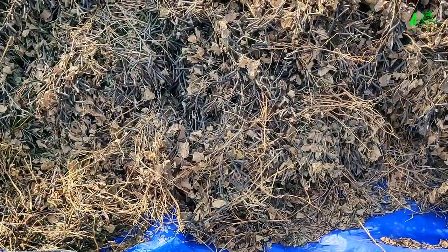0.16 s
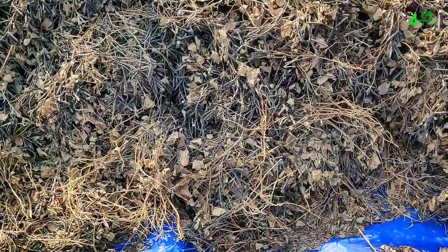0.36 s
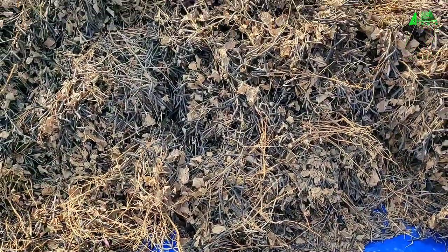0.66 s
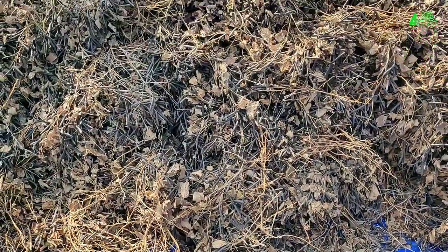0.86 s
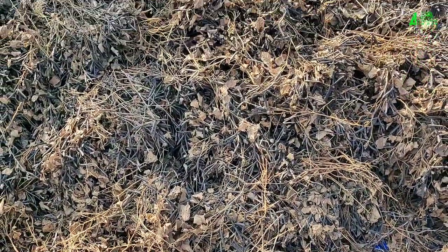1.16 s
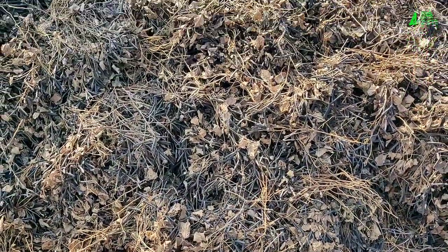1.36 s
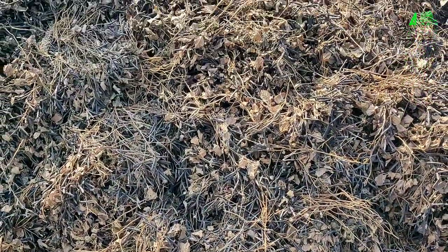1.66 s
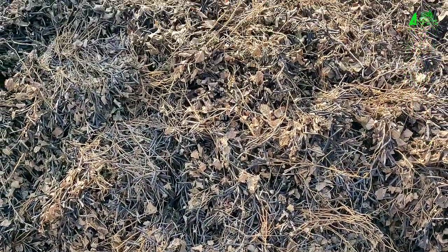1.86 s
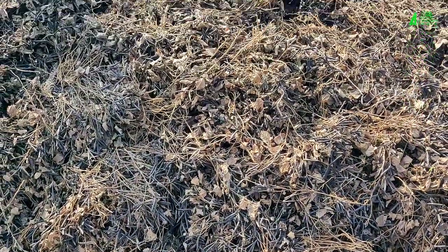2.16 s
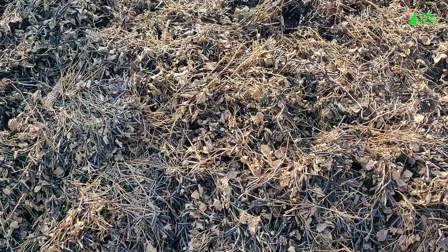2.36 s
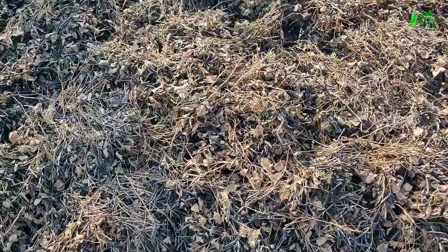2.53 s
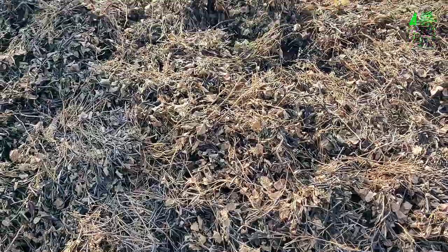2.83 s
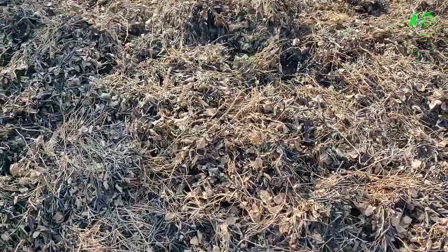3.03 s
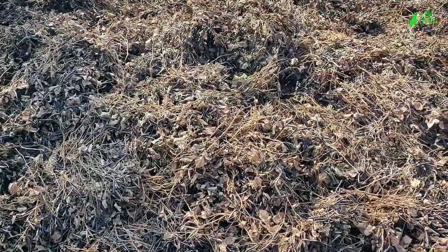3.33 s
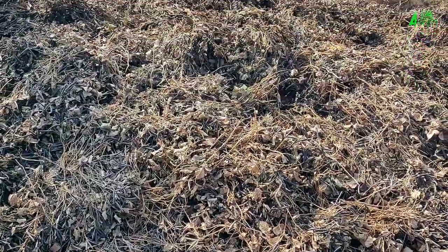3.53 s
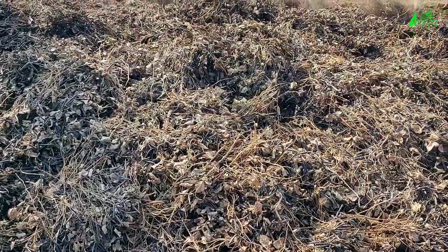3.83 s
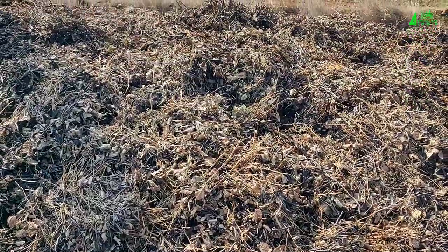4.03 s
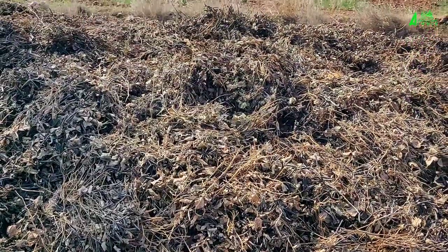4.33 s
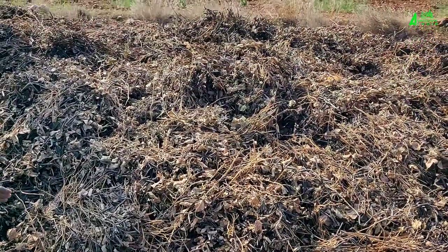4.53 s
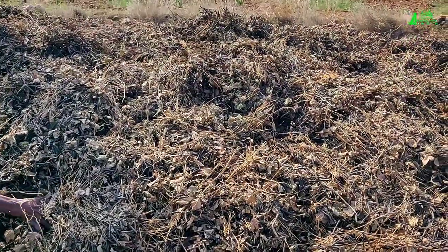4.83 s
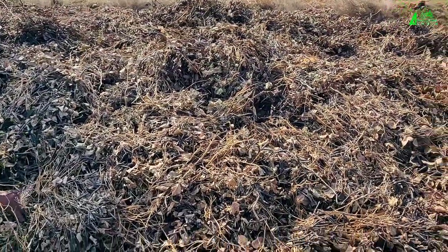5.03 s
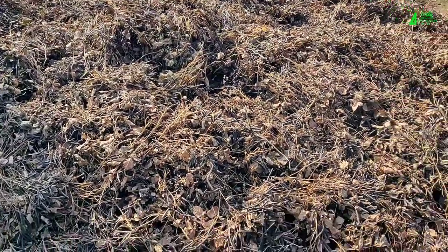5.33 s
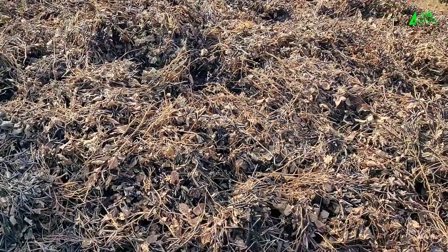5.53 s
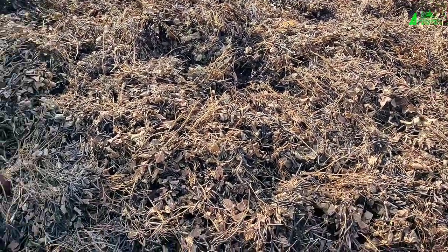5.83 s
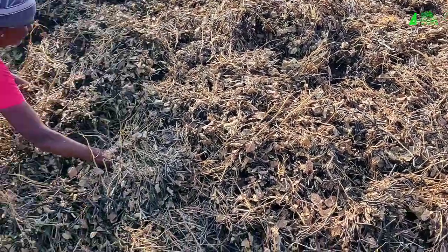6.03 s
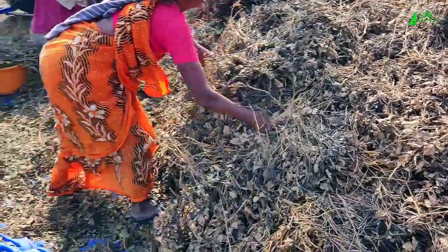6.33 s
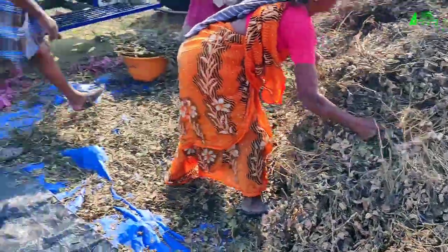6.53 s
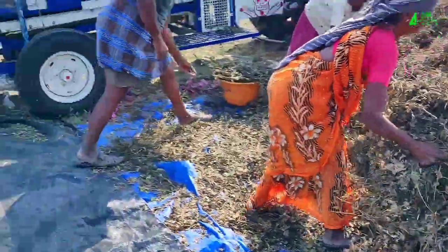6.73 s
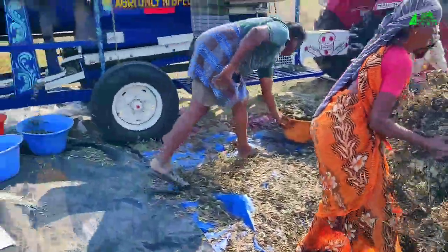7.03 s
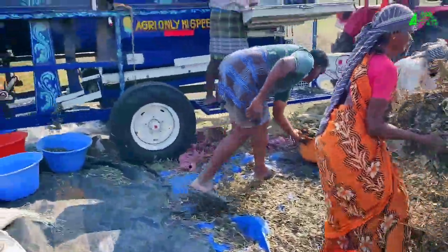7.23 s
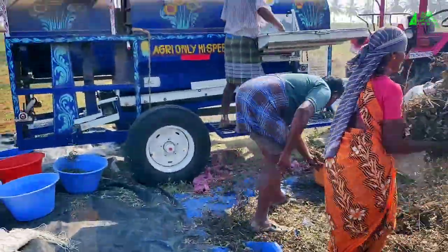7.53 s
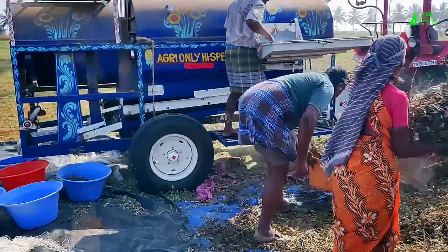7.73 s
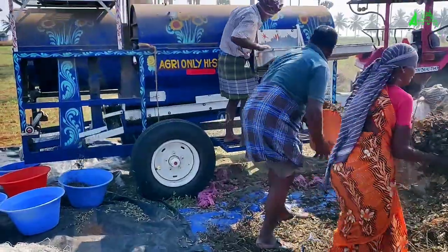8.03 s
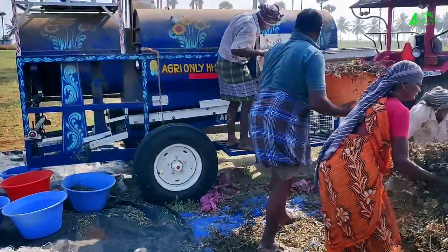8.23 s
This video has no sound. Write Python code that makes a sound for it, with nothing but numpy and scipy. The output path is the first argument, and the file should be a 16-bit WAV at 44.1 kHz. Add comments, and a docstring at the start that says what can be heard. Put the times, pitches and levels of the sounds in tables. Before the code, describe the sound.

A threshing machine roars and clatters over a tractor engine's constant drone, dry straw hissing and snapping as it feeds through.

```python
"""An open field with crop heaps, a diesel tractor driving a threshing machine at near-constant speed.
The exhaust throbs against the slightly slower drum, which roars and growls as it takes in haulm.
The sieve knocks at every stroke, pods pelt the casing, and dry stalks hiss and snap on their way through.
The stereo microphone stands side-on, the machines to its left; about six seconds in it swings
most of the way round to face them."""
import sys
import numpy as np
from scipy import signal
from scipy.fft import rfft, irfft, next_fast_len
from scipy.io import wavfile
from scipy.ndimage import map_coordinates

SR = 44100
rng = np.random.default_rng(int(sys.argv[2]) if len(sys.argv) > 2 else 0)


def transcribe(signal):
    """Save signal, clipped to [-1, 1], as a 16-bit WAV file at the path in sys.argv[1]."""
    frames = np.atleast_2d(signal).T
    limited = np.clip(frames, -1, 1)
    pcm = np.round(limited * 32767).astype(np.int16)
    wavfile.write(sys.argv[1], SR, pcm)


N = 369558

# flow of haulm, heard in the hiss and the splintering: time_s, relative_db
HAULM_FEED = [(0, -34), (1.3, -35.3), (1.6, -34), (1.9, -34.8), (4.1, -34.3), (4.43, -33.5), (4.7, -34.2),
              (5.1, -33.4), (5.75, -34.4), (6.0, -33.8), (6.3, -31.4), (6.38, -28), (6.54, -30.4),
              (7.3, -30.8), (8.38, -32.4)]
SIEVE_CYCLES_PER_FIRING, SIEVE_START_S = .0819, .114


def amp(db):
    """Decibels to gain."""
    return 10 ** (np.asarray(db) / 20)

def unit(x):
    """Scale to rms 1."""
    return x / np.sqrt(np.mean(x ** 2) + 1e-20)

def clock():
    """The time of every sample, in seconds."""
    return np.arange(N) / SR

def curves(rows):
    """One value per sample for each column after the time."""
    times, *columns = np.transpose(rows)
    return [np.interp(clock(), times, column) for column in columns]

def along(points, hz):
    """Read (frequency_hz, value) points on a log axis."""
    point_hz, value = np.transpose(points)
    return np.interp(np.log(hz + 1), np.log(point_hz), value)

def wobble(rate):
    """A smooth random curve, rate knots a second."""
    knots = rng.standard_normal(int(N * rate / SR) + 4)
    return map_coordinates(knots, [clock() * rate], mode="nearest")

def filtered(x, response):
    """Filter x by a gain given as a function of frequency."""
    size = next_fast_len(N + SR // 2)
    return irfft(rfft(x, size) * response(np.fft.rfftfreq(size, 1 / SR)), size)[..., :N]

def coloured(x, points):
    """Shape x by (frequency_hz, gain_db) points."""
    return filtered(x, lambda hz: amp(along(points, hz)))

def noise(points, channels=1):
    """Coloured noise of rms 1, unrelated between channels."""
    return unit(coloured(rng.standard_normal((channels, N)), points))

def grains(points, per_second, spread_db, share, channels=1):
    """Tiny uneven impacts, carrying a share of the power, on a bed of noise; rms 1."""
    shape = (channels, N)
    hits = (rng.random(shape) < per_second / SR) * rng.choice([-1, 1], shape)
    sizes = amp(spread_db * rng.uniform(-0.77, 1, shape))
    bed = np.sqrt(1 - share) * rng.standard_normal(shape)
    return unit(coloured(np.sqrt(share) * unit(hits * sizes) + bed, points))

def rotation(cycles_per_firing, start_s):
    """Cycles turned since start_s by a shaft belted to the engine."""
    # governed engine speed, sagging a little after the last wad: time_s, firing_rate_hz
    engine_speed = [(0, 46.76), (1.5, 46.74), (2.6, 46.81), (4.8, 46.775), (6.1, 46.83), (7.1, 46.75),
                    (7.65, 46.62), (8.38, 46.74)]
    cycles = cycles_per_firing * np.cumsum(curves(engine_speed)[0]) / SR
    return cycles - np.interp(start_s, clock(), cycles)


def field_wash(level_db=-45):
    """The din comes back to the microphone from all sides, scattered by the crop heaps."""
    # scattered sound: frequency_hz, density_db
    spectrum = [(30, 19), (120, 15), (300, -14), (540, -6), (750, -4.5), (1100, 11), (1600, -12), (2400, 3),
                (4000, -30), (9000, -22)]
    return amp(level_db + 1.8 * wobble(12)) * noise(spectrum, channels=2)

def heap_echo(facing, level_db=-45, turn_db=-11):
    """Side-on, much of the drum's roar arrives off the heaps, different at each microphone port."""
    # reflected roar: frequency_hz, density_db
    spectrum = [(80, -6), (180, -1), (280, -4), (400, -2), (600, -1), (800, -7), (950, -4), (1200, -9),
                (1500, -22), (2500, -35)]
    return amp(level_db + turn_db * facing) * noise(spectrum, channels=2)

def handling_bump(at_s=4.8905, level_db=-26, pitch_hz=90, width_s=0.006):
    """One soft low thump, carried through the microphone body."""
    t = clock() - at_s
    return -amp(level_db) * np.cos(2 * np.pi * pitch_hz * t) * np.exp(-.5 * (t / width_s) ** 2)

def squeak(at_s=0.122, level_db=-41, pitch_hz=5030, width_s=0.011):
    """One brief, thin, wavering squeak of rubbing metal."""
    t = clock() - at_s
    tone = np.sin(2 * np.pi * (pitch_hz * t + 0.04 * wobble(200)))
    return amp(level_db) * tone * np.exp(-.5 * (t / width_s) ** 2)

def straw_hiss(facing, gain_db=-5, turn_db=2.5, toss_db=0.66, lag_cycles=0.037):
    """Shredded haulm is tossed at each stroke and blown out; it moves right as the microphone turns."""
    # dry straw: frequency_hz, density_db
    spectrum = [(500, -16.5), (2000, 2), (3200, -1.5), (4200, 2), (5500, 6.5), (9000, 3), (16000, -5.5)]
    strokes = 2 * (rotation(SIEVE_CYCLES_PER_FIRING, SIEVE_START_S) - lag_cycles)
    surge_db = toss_db * np.cos(2 * np.pi * strokes) + 0.51 * wobble(15) + 0.89 * wobble(70)
    balance_db = turn_db * facing * np.array([[-1], [1]])
    crackle = grains(spectrum, per_second=1400, spread_db=7, share=0.24, channels=2)
    return amp(curves(HAULM_FEED)[0] + gain_db + surge_db + balance_db) * crackle

def crunch(pitch_hz, rise_s):
    """The fibres of one stalk give way in a quick run of tiny cracks around its own pitch."""
    # one crack: pitch_multiple, density_db
    spectrum = [(.1, -22), (.3, -12), (.6, -7), (1, 2), (1.35, -4), (2, -14)]
    age = np.arange(SR // 16) / SR / rise_s
    fibres = rng.standard_normal((2, len(age))) * amp(1.5 * rng.standard_normal((2, len(age))))
    hz = np.fft.rfftfreq(len(age), 1 / SR)
    colour = amp(along(np.multiply(spectrum, [pitch_hz, 1]), hz))
    crack = irfft(rfft(fibres) * colour, len(age))
    return unit(crack) * age * np.exp(1 - age)

def stalks(gain_db=-8, splinters_per_s=40, thick_rise_s=0.0036, thin_rise_s=0.0028):
    """Thick stalks break with a crunch; thin stems splinter at random, louder as more haulm is fed."""
    # thick stalks snapping in the drum: start_s, relative_db, pitch_hz
    snaps = [(0.114, -31, 5500), (0.637, -28, 6500), (2.114, -29, 6500), (3.424, -28, 6000),
             (3.510, -30, 7500), (3.645, -29.5, 6500), (3.902, -29.5, 7500), (4.111, -29, 7000),
             (4.403, -26.5, 6500), (4.892, -28.5, 7000), (5.073, -28, 6000), (5.206, -28, 7000),
             (5.506, -29, 6500), (5.553, -29, 7500), (5.853, -28, 6000), (6.121, -28, 7000),
             (6.575, -28, 7000), (6.708, -23.5, 6300), (6.797, -27.5, 6500), (6.868, -27, 8200),
             (7.163, -24, 6200), (7.178, -25, 7500), (7.317, -28, 7000), (7.962, -25.5, 6500),
             (8.19, -27.5, 7000)]
    count = int(splinters_per_s * N / SR)
    times = rng.uniform(0, N / SR, count)
    size, pitch_scatter = rng.standard_normal((count, 2)).T
    levels_db = np.interp(times, *np.transpose(HAULM_FEED)) - 6 + 2 * np.minimum(size, 2)
    pitches_hz = 6800 * 2 ** (.2 * pitch_scatter)
    splinters = zip(times, levels_db, pitches_hz)
    out = np.zeros((2, N + SR))
    for breaks, rise_s in (snaps, thick_rise_s), (splinters, thin_rise_s):
        for start_s, db, pitch_hz in breaks:
            snap, start = crunch(pitch_hz, rise_s), round(start_s * SR)
            out[:, start:start + snap.shape[1]] += amp(gain_db + db) * snap
    return out[:, :N]

def wads(gain_db=-2):
    """Each thick wad makes the drum housing growl; the pitch may glide as it is drawn through."""
    # the drum bites into a wad: centre_s, relative_db, width_s, pitch_factor, glide_octaves_per_s
    bites = [(1.355, -35.5, .03, 1.05, 4.5), (1.425, -40, .03, .6, -2), (3.4, -40, .05, .8, 0),
             (3.77, -37, .06, .9, 1), (4.306, -36.5, .055, .82, 1.5), (4.648, -38, .06, .9, -1),
             (5.09, -42, .03, 1, 0), (7.196, -43, .03, 1, 0)]
    # the housing's growl: frequency_hz, density_db
    spectrum = [(200, -20), (350, -6), (430, -1), (500, 5), (570, -2), (700, -5), (1000, -16), (2000, -40)]
    out = np.zeros(N)
    for centre_s, db, width_s, pitch_factor, glide in bites:
        t = clock() - centre_s
        speed = pitch_factor * 2 ** (glide * np.clip(t, -2 * width_s, 2 * width_s))
        growl = map_coordinates(noise(spectrum)[0], [np.cumsum(speed)], order=1, mode="wrap")
        out += amp(gain_db + db) * np.exp(-.5 * (t / width_s) ** 2) * growl
    return out

def pods(level_db=-40.6, opening_db=4, easing_s=1.6, flurry_db=1.9):
    """Pods and stalks pelt the drum casing in flurries; the clatter starts a little louder and eases."""
    # clatter on the casing: frequency_hz, density_db
    spectrum = [(250, -14), (600, -0.5), (1100, -0.5), (1700, 8), (2450, -3.5), (3200, -15.5), (4300, -37),
                (6300, 1), (12000, -24)]
    opening_boost_db = opening_db * np.clip(1 - clock() / easing_s, 0, 1)
    flurries = amp(level_db + opening_boost_db + flurry_db * wobble(20))
    return flurries * grains(spectrum, per_second=600, spread_db=10, share=0.35)[0]

def struck_sieve(blows, clack_spectrum, clack_t60_s, clack_rise_s, ring_rise_s=0.0024, blur_hz=28):
    """At each blow (start_s, clack_db, ring_db) the load clacks on the sieve and its pan rings roughly."""
    # modes of the sieve pan: pitch_hz, relative_db, t60_s
    pan_modes = [(923, -2, 0.17), (679.3, -2.5, 0.17), (1079, -3, 0.081), (1310, -8, 0.073),
                 (1630, -14, .07), (2000, -2.5, 0.06)]
    t = np.arange(SR // 3) / SR
    rattle, ring = np.zeros((2, N + SR))
    for start_s, clack_db, ring_db in blows:
        # the shifting load changes the modes at every blow and blurs them as they ring
        scatter = rng.standard_normal((len(pan_modes), 3)) * [2, .022, 1]
        phase_steps = rng.standard_normal((len(pan_modes), len(t))) * np.sqrt(2 * np.pi * blur_hz / SR)
        drifts = np.cumsum(phase_steps, axis=1)
        modes = np.zeros(len(t))
        for (hz, db, t60_s), (size_db, detune, phase), drift in zip(pan_modes, scatter, drifts):
            tone = np.sin(2 * np.pi * (hz * (1 + detune) * t + phase) + drift)
            modes += amp(db + size_db - 60 * t / t60_s) * tone
        start = max(0, round(start_s * SR))
        span = slice(start, start + len(t))
        ring[span] += amp(ring_db) * (1 - np.exp(-t / ring_rise_s)) * modes
        rattle[span] += amp(clack_db - 60 * t / clack_t60_s) * (1 - np.exp(-t / clack_rise_s))
    return ring[:N] + rattle[:N] * noise(clack_spectrum)[0]

def clods():
    """Hard clods, thrown by the stroke, strike the sieve."""
    # clod strikes: start_s, clack_db, ring_db
    strikes = [(.30, -38, -50), (.375, -36.5, -48), (2.988, -36, -46), (3.246, -33.8, -46),
               (3.775, -39, -48), (4.03, -39, -48), (4.29, -34.5, -46), (4.428, -35.5, -46),
               (4.809, -36, -42), (5.328, -39, -48), (5.59, -41, -40), (5.852, -36.5, -41),
               (5.985, -41, -40), (6.11, -36.5, -42), (6.258, -42, -37), (6.508, -41, -34.5),
               (7.163, -37, -35.5), (7.3, -40, -36), (7.43, -40, -41), (7.688, -44, -36), (7.818, -44, -39)]
    # a clod's clack: frequency_hz, density_db
    spectrum = [(200, -20), (1200, -4), (1600, -6), (1900, 4), (2180, 7), (2500, -1), (2850, -12),
                (3700, -7), (4500, -13), (12000, -32)]
    return struck_sieve(strikes, spectrum, clack_t60_s=.08, clack_rise_s=.0017)

def sieve_knocks(jitter_s=0.00295, clack_scatter_db=2, ring_scatter_db=1.8):
    """The shaking sieve repeats the same four knocks every cycle, a little unevenly."""
    # out, rebound, back, rebound: cycle_share, clack_offset_db, ring_offset_db
    stroke = [(0, 0, 0), (.253, -9, -5), (.515, -4, -0.5), (.768, -11, -5)]
    # force of the knocks as the load changes: time_s, clack_db, ring_db
    force = [(0, -39, -46), (1.4, -41, -41), (2.6, -41, -40), (3.2, -39.5, -41), (5.6, -39.5, -42),
             (6.15, -41, -35.5), (7, -42, -36), (7.6, -42, -37.5), (8.38, -42, -36.5)]
    # the load's clack: frequency_hz, density_db
    spectrum = [(200, 6), (700, -8), (1200, 13), (1600, -8), (2200, 6), (3200, 2.5), (4500, 0), (6500, -12),
                (12000, -22)]
    cycles = rotation(SIEVE_CYCLES_PER_FIRING, SIEVE_START_S)
    knocks = [(turn + share, clack, ring) for turn in range(int(cycles[-1]) + 1)
              for share, clack, ring in stroke if turn + share < cycles[-1]]
    knock_cycles, clack_db, ring_db = np.transpose(knocks)
    at = np.searchsorted(cycles, knock_cycles)
    clack_force_db, ring_force_db = curves(force)
    blows = np.transpose([at / SR, clack_db + clack_force_db[at], ring_db + ring_force_db[at]])
    blows += rng.standard_normal(blows.shape) * [jitter_s, clack_scatter_db, ring_scatter_db]
    return struck_sieve(blows, spectrum, clack_t60_s=.11, clack_rise_s=0.0022)

def throb(harmonics, cycles, flutter_db, smear_cycles):
    """One pressure dip per cycle, smeared by the ducting; each harmonic flutters in level."""
    out = np.zeros(N)
    for order, db in harmonics:
        level = amp(db + flutter_db * np.sqrt(order) * wobble(5.4))
        out -= level * np.cos(2 * np.pi * (order * cycles + smear_cycles * order ** 2))
    return np.sqrt(2) * out

def exhaust_and_drum(puff_depth=0.12):
    """Exhaust and drum beat together; the roar follows the drum's load and swells with every firing."""
    # exhaust tones: firing_multiple, level_db
    exhaust_tones = [(1, -32), (2, -31), (3, -46.8), (4, -62), (5, -48.4), (6, -62), (7, -51), (8, -53.8),
                     (9, -56.5), (11, -59.5), (13, -61)]
    # drum and fan tones: turning_multiple, level_db
    drum_tones = [(1, -51.5), (2, -43.2), (3, -46), (4, -46.5), (5, -55)]
    # the drum's roar under changing load: time_s, level_db
    drum_load = [(0, -39), (.6, -38), (1.6, -38), (2.9, -39.5), (3.4, -37.5), (4.1, -39), (4.6, -38.5),
                 (5.7, -39.5), (6.3, -37.5), (6.9, -37.5), (7.65, -38), (8.38, -37)]
    # colour of the roar: frequency_hz, density_db
    spectrum = [(15, -12), (35, -3.5), (65, -2), (95, 6), (125, 3.5), (155, -3.5), (183, 1.5), (215, -3.2),
                (400, -1.6), (600, -4.2), (850, -13), (1500, -25), (4000, -38)]
    firings = rotation(cycles_per_firing=1, start_s=.015)
    turns = rotation(cycles_per_firing=.4875, start_s=.0281)
    puffs = 1 + puff_depth * np.cos(2 * np.pi * firings) ** 3
    roar = amp(curves(drum_load)[0]) * unit(puffs * noise(spectrum)[0])
    exhaust = throb(exhaust_tones, firings, flutter_db=0.18, smear_cycles=-.008)
    drum = throb(drum_tones, turns, flutter_db=0.8, smear_cycles=0.018)
    return exhaust + drum + roar


def at_microphone(din, facing):
    """As the microphone turns, the right port's lag and the body's colour ease; ground bounce grows."""
    # the body's colour at each port, applied twice over when side-on: frequency_hz, gain_db
    body_left = [(300, 0.5), (520, -0.2), (800, -2.6), (935, 1.8), (1050, -.2), (1250, 1.5), (1580, .2),
                 (1850, -3), (2050, -5.5), (2500, 0.6), (4000, -1.5)]
    body_right = [(300, 0.7), (520, 0.2), (780, 1.6), (930, 1.3), (1080, 1), (1300, 2.6), (1550, .6),
                  (1750, -.6), (2000, 1.9), (4000, 1.4)]
    # notches carved by the ground bounce when facing the machines: frequency_hz, gain_db
    ground_bounce = [(100, -0.5), (350, 0), (430, -5), (505, -13), (565, -14), (640, -1.5), (780, 4),
                     (900, 2), (1200, 0), (1600, -9), (2300, -2), (2750, -9), (3100, -2), (5000, -6)]
    # side-on, sound bends round the body and reaches the right port late: frequency_hz, lag_s
    right_lag = [(100, .00042), (500, .00031), (950, .00035), (1200, .00031), (1600, .00031), (2500, .0004),
                 (6000, .00041)]
    hz, t, spectra = signal.stft(din, SR, nperseg=1024)
    hz, turned = hz[:, None], np.interp(t, clock(), facing)
    ground_db = turned * along(ground_bounce, hz)
    left, right = (amp((2 - turned) * along(body, hz) + ground_db) for body in (body_left, body_right))
    delay = np.exp(-2j * np.pi * hz * along(right_lag, hz) * (1 - turned))
    return signal.istft(spectra * np.array([left, right * delay]), SR, nperseg=1024)[1][:, :N]

def scene():
    """The working machines, their straw and the open field, heard from one spot."""
    # the microphone's swing: time_s, facing_share (0 side-on, 1 facing the machines)
    heading = [(0, 0.088), (1.2, 0.086), (2.4, 0.026), (5.95, 0), (6.3, 0.14), (6.6, 0.68), (7.1, 0.74)]
    facing = np.clip(curves(heading)[0], 0, 1)
    din = sieve_knocks() + clods() + exhaust_and_drum() + pods() + wads() + squeak()
    direct = at_microphone(din, facing) + straw_hiss(facing) + stalks()
    return direct + field_wash() + heap_echo(facing) + handling_bump()

def record(dry):
    """Each microphone port has its own treble resonance; nothing passes above the band limit."""
    # response of each port: frequency_hz, gain_db
    left_port = [(2500, 0.5), (4000, 4.5), (4700, 3), (5500, 6.5), (6350, 13.5), (6900, 8), (7500, 6.5),
                 (8500, -5), (9200, -38), (11000, -32), (13500, -10.5), (16000, -32)]
    right_port = [(2500, -0.5), (4000, 5), (5000, 6), (6300, 6.5), (7400, 8.5), (8500, 13.5), (9000, 9.5),
                  (9500, 5.5), (10200, -10.5), (12000, 0.5), (16000, 2.5)]
    ports = np.array([coloured(dry[0], left_port), coloured(dry[1], right_port)])
    return filtered(ports, lambda hz: hz < 15780)


dry = scene()
out = record(dry)
transcribe(out)
```